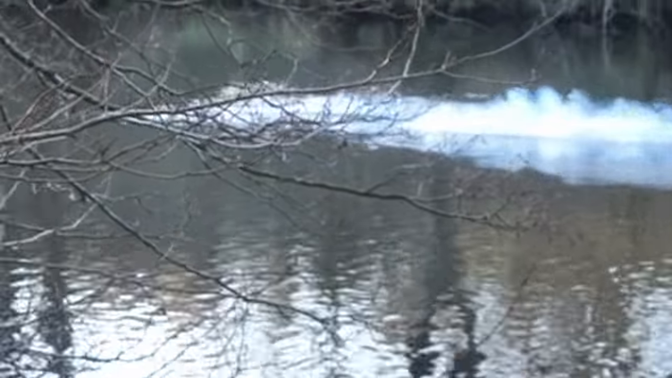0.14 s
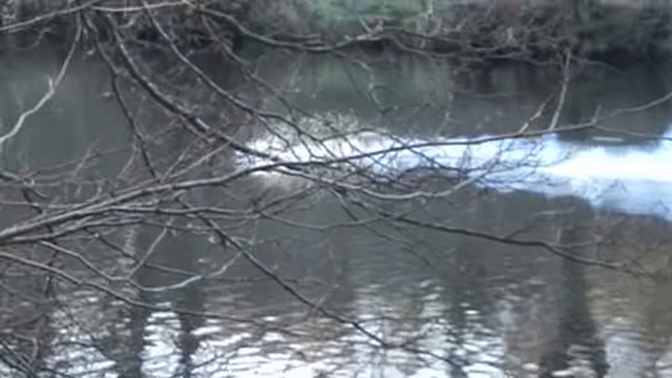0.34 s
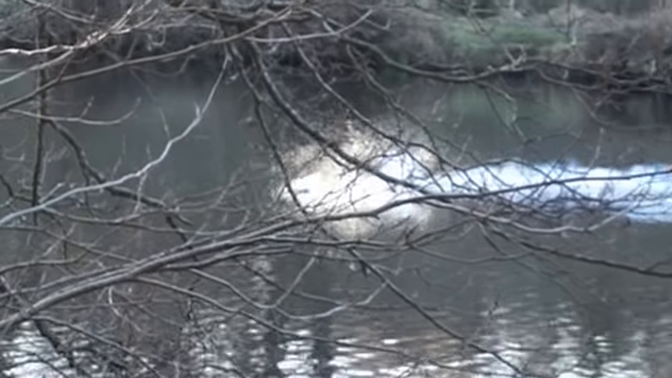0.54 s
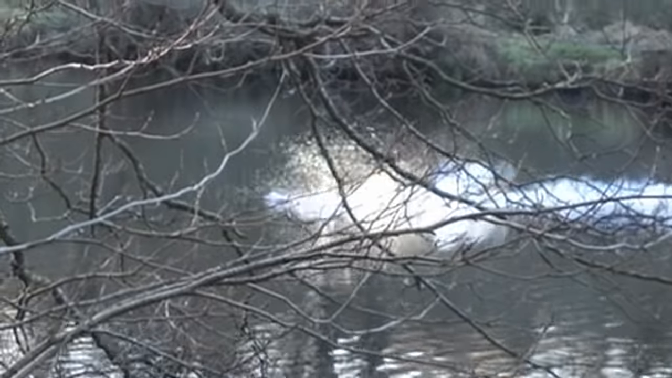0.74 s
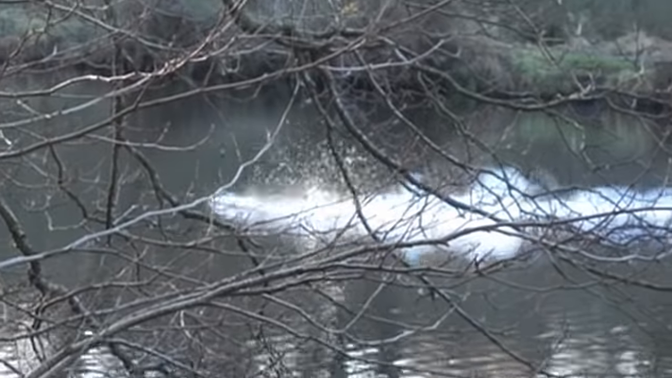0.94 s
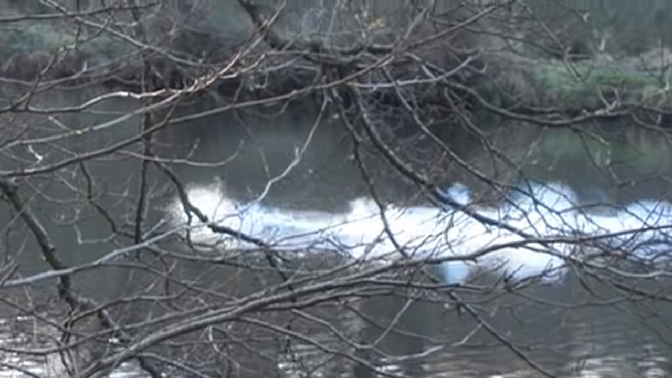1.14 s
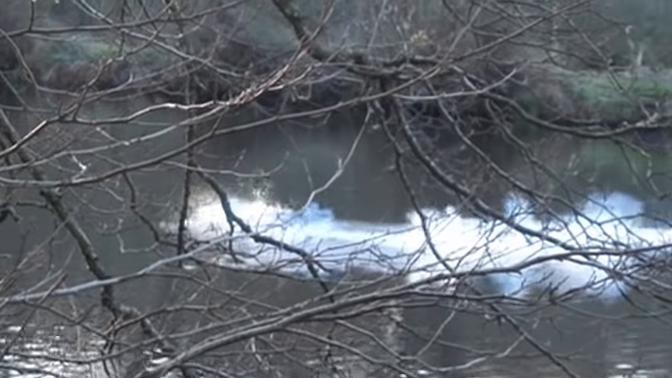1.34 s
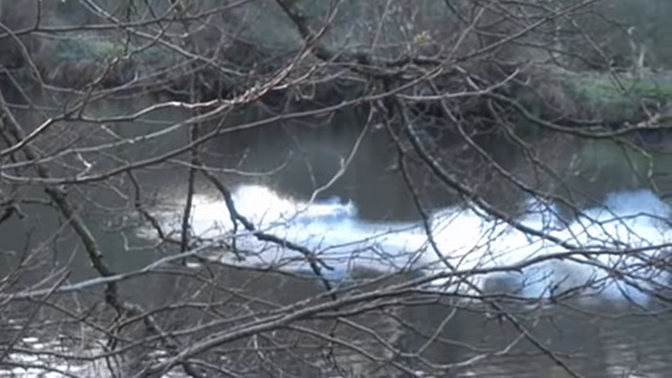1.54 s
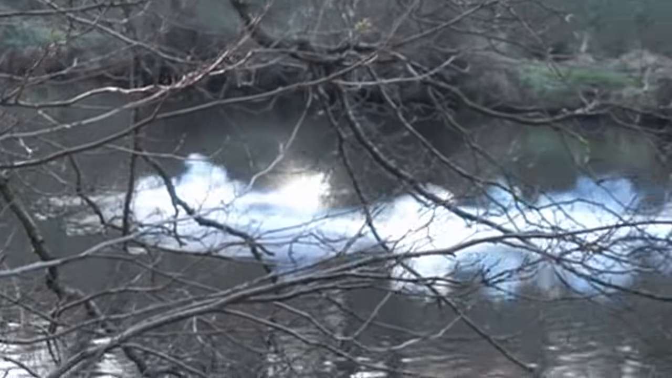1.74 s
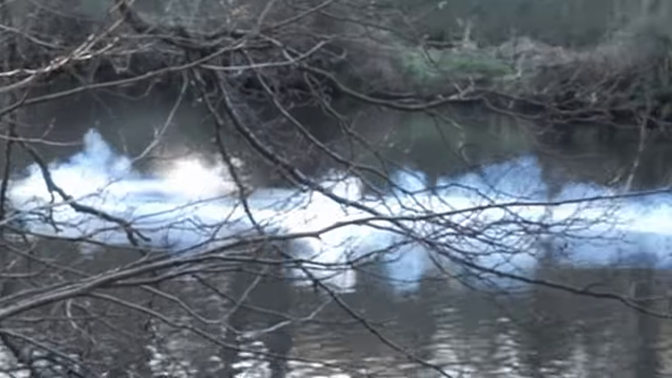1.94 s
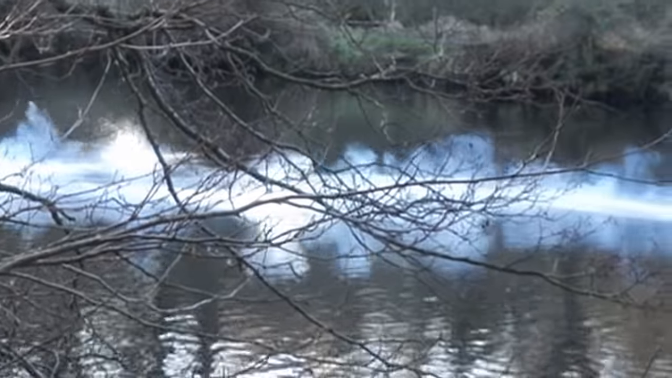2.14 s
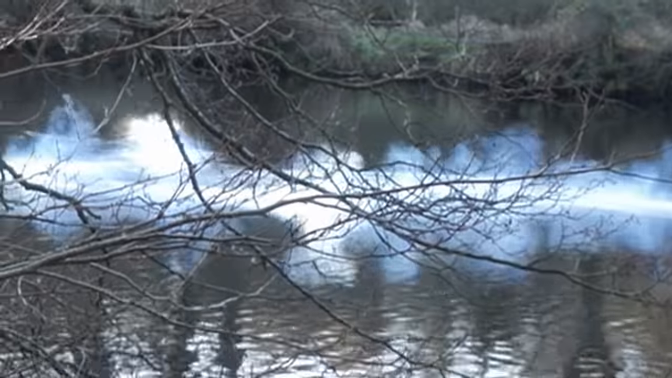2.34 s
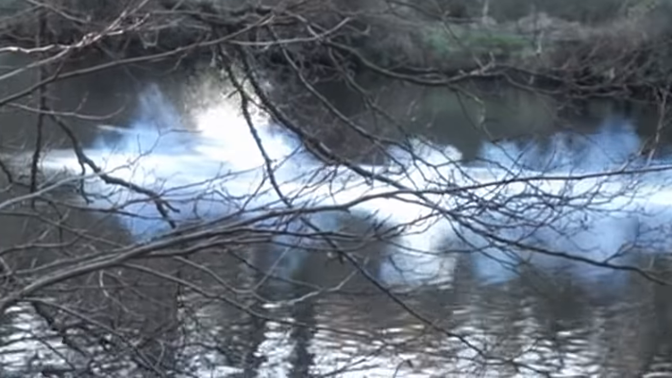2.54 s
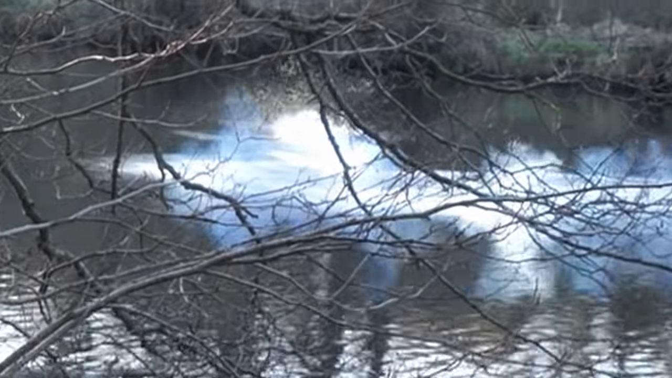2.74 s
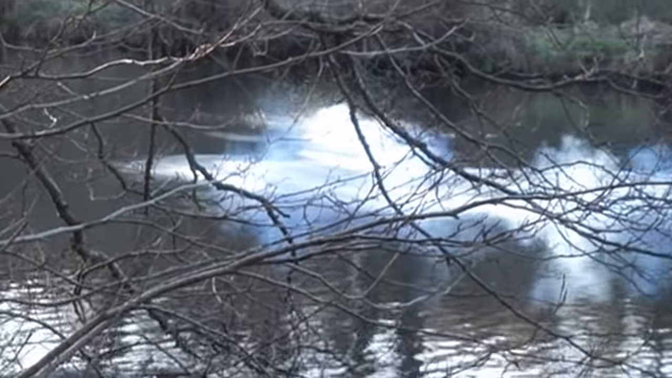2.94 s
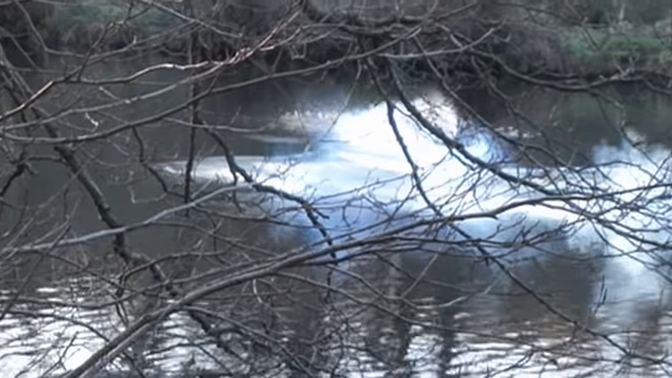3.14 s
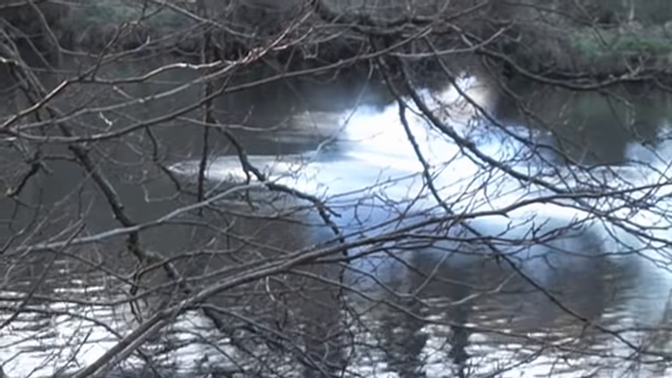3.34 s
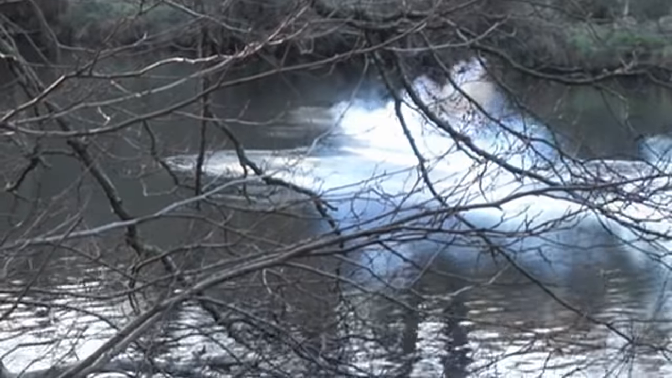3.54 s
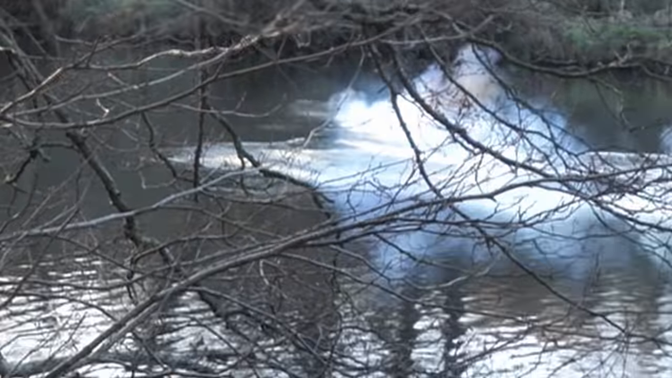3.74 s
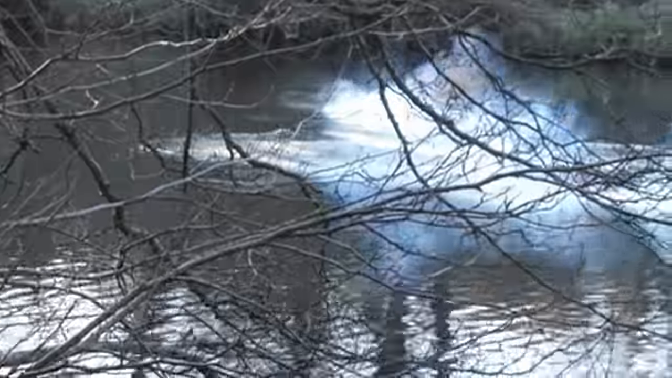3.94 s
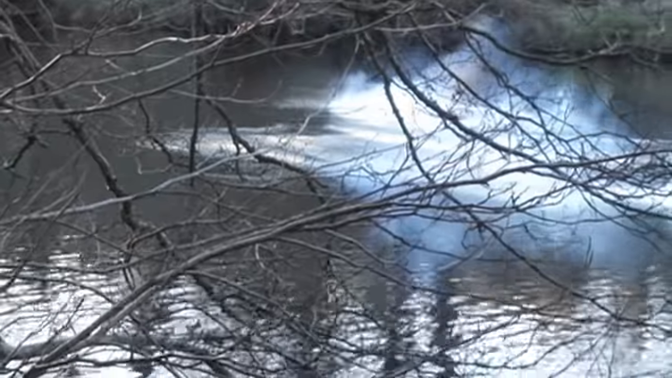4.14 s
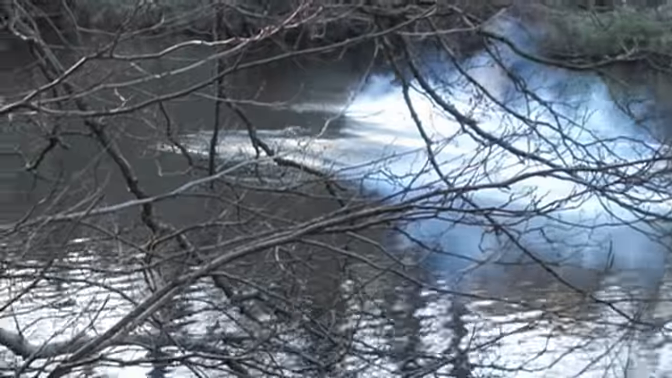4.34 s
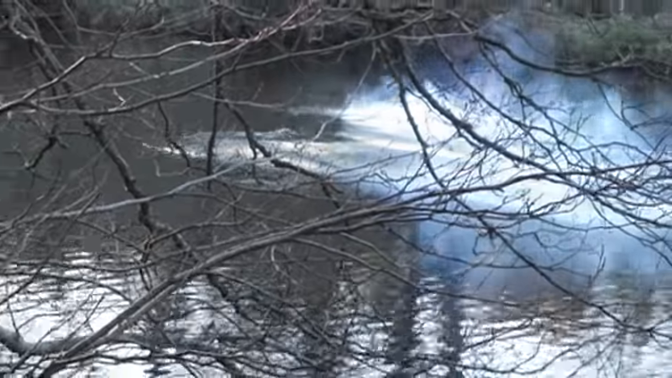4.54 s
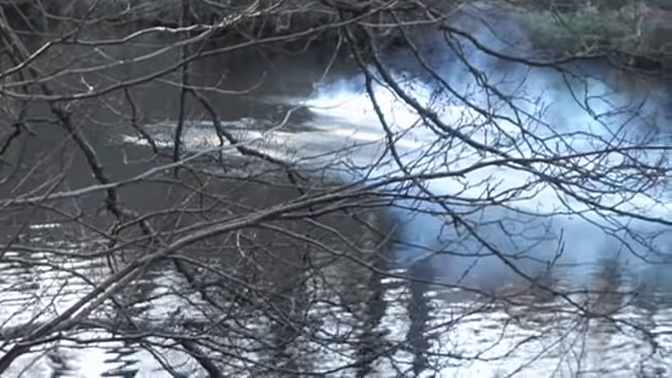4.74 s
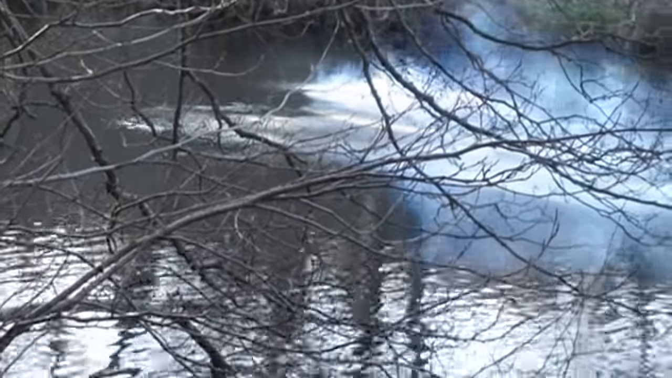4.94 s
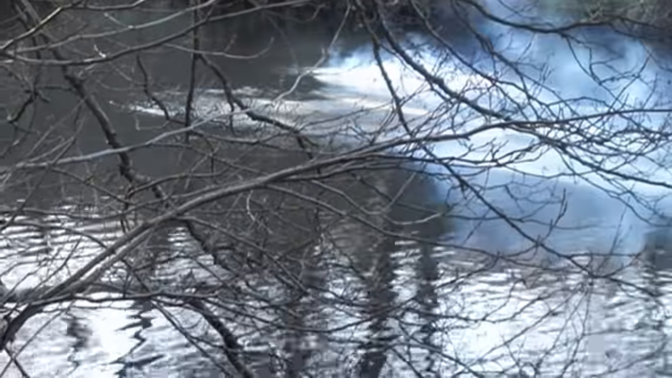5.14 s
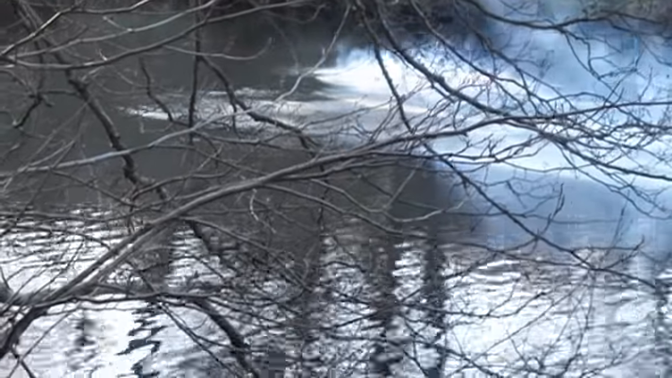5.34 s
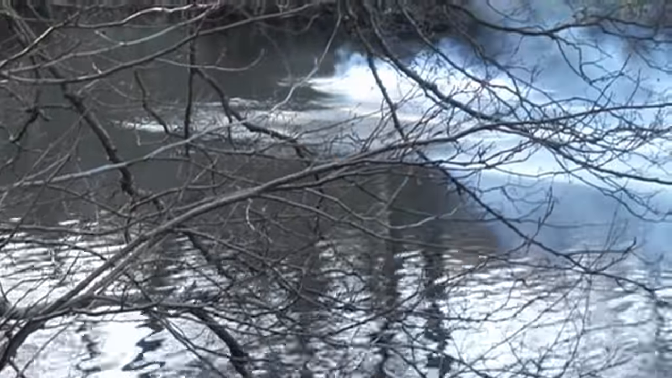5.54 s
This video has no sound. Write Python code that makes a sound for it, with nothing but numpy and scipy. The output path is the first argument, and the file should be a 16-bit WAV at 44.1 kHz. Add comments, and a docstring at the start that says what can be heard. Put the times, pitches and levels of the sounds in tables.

```python
"""A small solid-fuel rocket motor skips over a pond, heard in stereo with close bank reflections and a tail
from the trees. From the start its jet (crackling noise bands) hisses and its wake (sliding and lumpy noise)
roars and churns over a steady far rumble, with swells of the gas pocket's ring and gulps (pitched noise) and
shock pops (short decaying sines). It chokes after about 3.4 s and relights in short bursts. Faint tones and
ticks (noise snaps) sit in the pause before the late bubbles (soft ringing sines) and the last burns."""
import sys
import numpy as np
from scipy import signal
from scipy.fft import rfft, irfft, next_fast_len
from scipy.io import wavfile
from scipy.ndimage import uniform_filter1d, map_coordinates

SR = 44100
rng = np.random.default_rng(int(sys.argv[2]) if len(sys.argv) > 2 else 0)


def to_wav(sig):
    """Store sig (one row per channel, or 1-D mono) as 16-bit WAV at the path in sys.argv[1].

    Samples outside -1..1 are clipped; the rate is SR.
    """
    pcm = np.clip(np.atleast_2d(sig), -1, 1) * 32767
    pcm = np.round(pcm).astype(np.int16)
    wavfile.write(sys.argv[1], SR, pcm.T)  # frames by channels


N = 250488

# Source levels are set ahead of the final mix. Spectra of the noise layers give colour only.
# Free jet, one list per burn: time_s, sizzle_db, hiss_over_sizzle_db, fizz_over_sizzle_db
JET_BURNS = [
    [(0.0, -24.5, -5.5, -10.5), (0.05, -25.5, -1.5, -13), (0.14, -30.5, 0.5, -7), (0.25, -29, -3, -8.5),
     (0.55, -30.5, 1, -8.5), (0.59, -26.5, -3.5, -5.5), (0.68, -17, -5, -11), (0.7, -45.5, 0, -12),
     (0.71, -27, 5, -13.5), (0.73, -36, -4.5, -11.5), (0.8, -31, -4, -3.5), (0.83, -35, 2.5, -18.5),
     (0.85, -45.5, 6.5, -11), (0.91, -39, 3, -15), (0.92, -29.5, -2, -2), (0.95, -19.5, -4.5, -8),
     (0.99, -23, 0, -2.5), (1.01, -46, 14, -8), (1.05, -47.5, 1.5, -5.5), (1.07, -25, -1, -9),
     (1.11, -25, -1, -7.5), (1.13, -26.5, 5.5, -4.5), (1.16, -26.5, 1, -11.5), (1.2, -36.5, 7, -10),
     (1.31, -37, -18.5, -16), (1.33, -27, -9, -19.5), (1.39, -22.5, -3, -9), (1.43, -21, -7.5, -12),
     (1.44, -33, 3, -4), (1.47, -29, 2.5, -12), (1.5, -31, 2.5, -5.5), (1.52, -27.5, -4, -12.5),
     (1.53, -17.5, -12.5, -11.5), (1.55, -24, -8.5, 3), (1.57, -18.5, -12, -12), (1.63, -29, 3.5, -6),
     (1.66, -14, -8, -18), (1.67, -14.5, -5.5, -15), (1.68, -21, -0.5, -6), (1.69, -24, 2.5, -16.5),
     (1.82, -37, 0.5, -7.5), (1.88, -29.5, 0.5, -9.5), (1.92, -35, 7.5, -3.5), (2.01, -29, 0, -7),
     (2.29, -33, 2, -10.5), (2.4, -32.5, 2, -10.5), (2.45, -27.5, -4.5, -8.5), (2.58, -48, 6.5, -14.5),
     (2.73, -37.5, 2, -15), (2.76, -25, -4.5, -21.5), (2.77, -30, -3, -15.5), (2.92, -34, -0.5, -14),
     (2.94, -38.5, 3.5, -10), (3.02, -38, 3.5, -15.5), (3.15, -26, 0, -18.5), (3.19, -31.5, 3.5, -21.5),
     (3.3, -25.5, 2, -14), (3.34, -48, 4, -18)],
    [(3.788, -45, -2.5, -10), (3.792, -34.5, -3.5, -11.5), (3.836, -39, 1, -16.5), (4.07, -40, -1, -13.5),
     (4.144, -30.5, 3, -5), (4.17, -24, -6.5, -11), (4.192, -25, -3, -8.5), (4.294, -25.5, -1, -13.5),
     (4.328, -50.5, 6, -19), (4.35, -40, 6.5, -24), (4.38, -48.5, 11.5, -13)],
    [(5.055, -61, -12.5, -16), (5.081, -48, -4.5, -18), (5.139, -41, 5.5, -15.5), (5.147, -31, 2.5, -12),
     (5.165, -38.5, 5, -8.5), (5.245, -37.5, 1.5, -9.5), (5.299, -23, -5, -1), (5.317, -23, 3, -16),
     (5.34, -41.5, 2.5, -12)],
    [(5.568, -55, 11.5, -12.5), (5.586, -50, 4, -10.5), (5.61, -61.5, 10, -12)],
    [(5.642, -38.5, 0.5, -10), (5.658, -36, -1.5, -5), (5.68, -30, -0.5, -10.5)],
]
# Exhaust ploughing the water, one list per burn: time_s, roar_db, growl_over_roar_db, roar_centre_hz
WAKE_BURNS = [
    [(0.0, -23, -17.5, 1810), (0.04, -21.5, -6, 1620), (0.06, -25, -13.5, 1560), (0.1, -23, -8, 2050),
     (0.16, -24.5, -13, 1500), (0.18, -23, -20, 1400), (0.22, -27, -8, 1550), (0.26, -26.5, -9, 2140),
     (0.34, -29, -12.5, 1690), (0.39, -39.5, 0, 1750), (0.41, -25.5, -11, 1700), (0.49, -30.5, -11, 1390),
     (0.53, -36, -13.5, 1720), (0.59, -23, -21, 1700), (0.62, -26.5, -2.5, 1590), (0.64, -21, -18.5, 1900),
     (0.68, -28.5, -20, 1840), (0.87, -27.5, -2, 1700), (0.93, -25, -11.5, 1710), (0.99, -24, -6.5, 1640),
     (1.02, -19.5, -15.5, 2100), (1.07, -29, -2, 1720), (1.1, -24, -2.5, 1850), (1.13, -27.5, -14, 1890),
     (1.19, -24.5, -4, 1670), (1.23, -20.5, -15.5, 1900), (1.4, -26, -6, 1490), (1.45, -25, -10, 1940),
     (1.51, -22.5, -6.5, 1440), (1.59, -33.5, -4.5, 1760), (1.68, -24.5, -19, 2100),
     (1.74, -27.5, -6, 1800), (1.78, -21, -17, 1840), (1.81, -22.5, -10, 1470), (1.82, -20, -16.5, 1450),
     (1.93, -23, -15, 2150), (2.17, -29, -12.5, 1670), (2.22, -23.5, -15.5, 1980), (2.28, -23, -8.5, 1760),
     (2.34, -27.5, -8, 1480), (2.37, -22.5, -12.5, 1620), (2.4, -26.5, -9.5, 1900),
     (2.52, -36, -12.5, 1790), (2.55, -33, -19.5, 1290), (2.57, -29.5, -11.5, 1500),
     (2.63, -31.5, -14.5, 1900), (2.65, -28.5, -11, 1860), (2.7, -38, -27.5, 1510), (2.76, -35, -17, 1890),
     (2.88, -36, -11, 1930), (2.93, -34.5, -11.5, 1610), (2.97, -36.5, -8, 1673), (2.98, -28.5, -9, 1860),
     (3.02, -36.5, -10, 2100), (3.3, -30.5, -14.5, 2280), (3.355, -28.5, -14.5, 2190),
     (3.38, -35, -9, 2200), (3.45, -46.5, -9.5, 2100)],
    [(3.788, -36, -32, 1790), (3.816, -44, -16, 2110), (3.822, -32.5, -21, 2130), (3.914, -31, -7.5, 2060),
     (3.972, -33, -11.5, 2410), (4.006, -38, -12, 2270), (4.022, -34, -15, 2350), (4.096, -38, -9, 1880),
     (4.132, -37, -7.5, 2260), (4.154, -38.5, -23.5, 2290), (4.19, -31, -12, 2140),
     (4.3, -32.5, -12.5, 2420), (4.316, -34.5, -34.5, 2420), (4.324, -28, -30, 2450), (4.4, -34, -18, 1540),
     (4.46, -41, -3, 1300)],
    [(5.045, -50, -9.5, 1490), (5.101, -35, -7.5, 1830), (5.193, -33, -18, 1920),
     (5.231, -36.5, -5.5, 1780), (5.305, -24, -12.5, 2000), (5.333, -38.5, -5.5, 1970),
     (5.36, -30.5, -9.5, 1550)],
    [(5.566, -33.5, -13, 2060), (5.584, -37, -19.5, 2120), (5.62, -56.5, 9, 1730)],
    [(5.642, -43.5, -8.5, 2210), (5.656, -26.5, -13.5, 2200), (5.68, -31.5, -5.5, 2190)],
]
# Level of the churning water: time_s, level_db
CHURN_LEVEL = [(0, -31), (.06, -45.5), (.4, -37), (.82, -33), (1.04, -43), (1.15, -38), (1.7, -47),
               (1.9, -40), (2.2, -41), (2.3, -34), (2.49, -40.5), (2.54, -50), (3.3, -56), (3.45, -76.5),
               (3.8, -75.5), (4.24, -54), (4.45, -64), (5.06, -71), (5.2, -37.5), (5.34, -48), (5.4, -45),
               (5.68, -48)]
# Colours of the jet, low to high: pitch_hz, density_db (per Hz)
HISS_COLOUR = [(1500, -15.5), (3000, -5.5), (4700, 2.5), (6300, -3), (8000, -5), (12000, -35.5)]
SIZZLE_COLOUR = [(4500, -36.5), (6800, -8), (9200, 4.5), (11500, -6.5), (13500, -27)]
FIZZ_COLOUR = [(9500, -20), (11500, 0), (14000, -1.5), (15800, -17.5)]
# Colour of the roar around its moving centre: offset_octaves, density_db (per Hz)
ROAR_COLOUR = [(-2, -79.5), (-0.98, -32), (-0.81, -7), (0.2, -1), (-1, 1.5), (0.42, -5), (0.73, -10.5),
               (1.5, -19), (2, -52.5), (4.5, -90.5)]
# Colours of the growl and the churn: pitch_hz, density_db (per Hz)
GROWL_COLOUR = [(300, -29.5), (480, -0.5), (700, -2), (900, 7), (1150, -8), (2000, -29.5)]
CHURN_COLOUR = [(60, -25), (150, -20), (280, 2), (400, -2), (550, 0.5), (800, -5), (1300, -35), (3000, -61)]
# Rings of the gas pocket in the wake: pitch_hz, level_over_roar_db
POCKET_RINGS = [(1300, -15.5), (2200, -11.5)]
# Colour of the far rumble: pitch_hz, density_db (per Hz)
FAR_COLOUR = [(25, -22.5), (60, 2.5), (135, 9.5), (190, -1.5), (265, -2.5), (370, -4.5), (540, -2),
              (700, -5), (1080, -2.5), (1300, -3), (1700, -11), (2000, -17.5), (3500, -24.5), (4200, -32),
              (9000, -33.5), (15800, -47)]
# Close reflections off the bank, before drift: delay_ms, signed_gain (ratio)
BANK_REFLECTIONS = [(1.33, .1), (1.46, .13), (1.58, -.22), (2.18, -.09), (2.6, .08)]
# Reflections shifting as the motor travels: time_s, delay_stretch (ratio), strength (ratio)
BANK_DRIFT = [(0, 1.03, .6), (1.3, 1.02, .6), (2.2, 1.06, .6), (2.7, 1.01, .6), (3.1, .995, .9),
              (4, .985, 1.2), (5.68, .985, 1.2)]
# Dull echo off the pond: time_s, delay_ms
POND_DELAY = [(0, 1.57), (2.5, 1.37), (3.5, 1.34), (5.68, 1.6)]
# Decay of the tail among the trees: pitch_hz, t60_s
TREE_DECAY = [(200, 0.28), (1000, 0.7), (2000, 0.8), (3200, 0.92), (5000, 0.74), (6500, 0.6), (9000, 0.38),
              (15000, 0.26)]
# Stereo width of far and scattered sound: pitch_hz, side_over_mid_db (far rumble 1.5 dB narrower)
DIFFUSE_WIDTH = [(60, -42.5), (250, -22), (1000, -12), (4000, -7.5), (12000, -18.5)]
# Side signal added to the near sound, uneven over pitch, lowered by another 8 dB in use: pitch_hz,
# side_over_mid_db
NEAR_SIDE = [(30, -11.5), (60, -48), (250, -25), (1000, -10), (2500, -13.5), (5000, -9), (8500, -34),
             (12000, -7.5)]
# Balance of the near sound: time_s, left_over_right_db
BALANCE = [(0, 0), (1.6, 0.6), (3.5, 0.3), (5.68, 0.6)]
# Swells of the gas pocket's ring, some as water closes over the nozzle: peak_s, pitch_hz, level_db, length_s,
# sink (octaves per s, negative rises)
RING_SWELLS = [(.11, 2850, -29, 0.18, -2), (.19, 1373, -27.5, 0.071, 0.5), (.28, 2140, -27.5, .1, 4),
               (.8, 800, -27.5, 0.085, -1), (1.02, 2230, -24.5, 0.052, -1.5), (1.1, 2165, -28.5, 0.12, 2.5),
               (1.24, 2250, -29, 0.087, 0), (1.355, 1490, -28.5, .06, 0), (1.84, 1300, -26, .08, 0),
               (2.555, 1258, -26.5, 0.054, 3), (2.615, 773, -31.5, 0.19, 4), (2.6, 1976, -32.5, 0.086, -2),
               (2.645, 1910, -26.5, .05, 2.5), (2.67, 1496, -30, .11, 5.5), (2.955, 1653, -35, .13, 0),
               (4.33, 2300, -34.5, .12, 1), (4.41, 2150, -38, 0.073, 0.5), (4.395, 1498, -32.5, .16, 5),
               (4.43, 1080, -33.5, .11, 8.5), (5.39, 768, -42, .14, 9)]
# Single shocks: start_s, level_db (before a 4 dB lift and bass thinning), pitch_hz
POP_HITS = [(0.3032, -1, 1780), (0.415, -17, 1900), (0.6415, -5, 1515), (0.9293, -11.5, 1820),
            (0.9532, -6, 1860), (1.0806, -5.5, 2720), (1.3667, -3, 1460), (1.7239, -4.5, 3160),
            (2.0463, -10.5, 1127), (2.195, -8.5, 1430), (2.2438, -14, 1995), (2.2762, -0.5, 1970),
            (2.4374, -10, 1871), (2.762, -16, 2360), (3.2498, -4, 2505), (3.4486, -22, 2660),
            (4.0777, -18, 2170), (4.111, -27.5, 1540), (4.383, -10.5, 2070)]
# Faint background tones: peak_s, pitch_hz, level_db, length_s, sink (octaves per s)
TONE_SWELLS = [(4.89, 1083, -51, .24, 0), (5, 1065, -50, .16, 0), (4.66, 265, -56, .14, 0),
               (5.41, 263, -48, .32, 0)]
# Faint near ticks: start_s, level_db (before a 1 dB cut and colouring)
TICK_HITS = [(4.7061, -50), (4.7265, -53.5), (4.757, -41.5), (4.7914, -45.5), (4.803, -55)]
# Filter colouring the ticks: pitch_hz, gain_db
TICK_COLOUR = [(3000, -20), (5000, 1.5), (9000, 8.5), (15800, -6.5)]
# Large late bubbles: start_s, level_db (before bass thinning), pitch_hz, rise_s
BUBBLES = [(5.097, -33, 300, .006), (5.103, -36, 490, .006), (5.2, -33, 270, .007), (5.245, -34, 480, .007),
           (5.495, -30, 545, .008), (5.603, -39, 800, .009)]

LIGHT_S, CHOKE_S = .014, 0.031  # a burn rises from and falls to silence
LUMPS_DB, LUMPS_PER_S = 1.2, 14  # random swells of roar, growl and churn
WANDER_HZ, POCKET_ENDS_S = 199.8, 2.5
FAR_DB = -45
POND_GAIN, POND_DULL_HZ = 0.13, 3300
TOP_HZ = 15800


def amp(db):
    """Decibels to gain."""
    return 10 ** (np.asarray(db) / 20)


def unit(x):
    """Scale to rms 1."""
    return x / np.sqrt(np.mean(x ** 2) + 1e-20)


def along(points, hz):
    """Read (Hz, value) points on a log frequency axis."""
    point_hz, values = np.transpose(points)
    return np.interp(np.log(hz + 1), np.log(point_hz + 1), values)


def curve(rows):
    """Draw (s, value) rows as one value per sample."""
    return np.interp(np.arange(N) / SR, *np.transpose(rows))


def column(burns, index):
    """Draw one level column of all burns in dB, with silence between burns."""
    curves = []
    for burn in burns:
        # columns after the first level are given relative to it
        levels = [(row[0], row[1] + (row[index] if index > 1 else 0)) for row in burn]
        lit = (burn[0][0] - LIGHT_S, -110)
        choked = (burn[-1][0] + CHOKE_S, -110)
        curves.append(curve([lit] + levels + [choked]))
    return np.max(curves, axis=0)


def wobble(rate):
    """A smooth random curve with rate knots a second."""
    knots = rng.standard_normal(int(N * rate / SR) + 4)
    return map_coordinates(knots, [np.arange(N) * rate / SR])


def filtered(x, response):
    """Shape x by a response given as a function of frequency."""
    size = next_fast_len(N + SR // 2)
    spectrum = rfft(x, size) * response(np.fft.rfftfreq(size, 1 / SR))
    return irfft(spectrum, size)[..., :N]


def shocks():
    """White noise and a heavy-tailed size for each sample: the crackle of small shock fronts."""
    noise = rng.standard_normal(N)
    size = np.minimum(rng.exponential(size=N), 4)
    return noise, size


def turbulence(spectrum, flow, patchy_db, flutter_db, spiky_db, fast_hz, centre_hz=None):
    """Flow noise at rms 1 with crackle, fast flutter and random patches; its colour may ride a moving centre."""
    noise, size = flow
    drive = noise * amp(spiky_db * size + flutter_db * wobble(fast_hz))
    hz, t, z = signal.stft(drive, SR, nperseg=512)
    patches = uniform_filter1d(rng.standard_normal(z.shape), 6, 0)
    patches = uniform_filter1d(patches, 8, 1)
    z = z * amp(patchy_db * unit(patches))
    if centre_hz is None:
        patchy = signal.istft(z, nperseg=512)[1][:N]
        return unit(filtered(patchy, lambda f: amp(along(spectrum, f))))
    centre = centre_hz[np.minimum(t * SR, N - 1).astype(int)]
    octaves = np.log2((hz[:, None] + 1) / centre)
    gain = amp(np.interp(octaves, *np.transpose(spectrum)))
    gain = gain / np.linalg.norm(gain, axis=0)  # even power as the centre slides
    return unit(signal.istft(z * gain, nperseg=512)[1][:N])


def glides(tracks, width_hz, steady):
    """A band of noise, part steady tone, around each moving pitch."""
    out = np.zeros(N)
    for hz, db in tracks:
        turn = np.exp(2j * np.pi * np.cumsum(hz) / SR)
        slow = steady + wobble(width_hz) + 1j * wobble(width_hz)
        out += amp(db) * unit((slow * turn).real)
    return out


def swells(rows):
    """Pitch and level of each row: a rounded swell, 20 dB down at its ends, on a gliding pitch."""
    t = np.arange(N) / SR
    tracks = []
    for peak_s, hz, db, length, sink in rows:
        pitch_hz = hz * 2 ** (-sink * np.clip(t - peak_s, -length, length))
        level_db = db - 20 * (2 * (t - peak_s) / length) ** 2
        tracks.append((pitch_hz, level_db))
    return tracks


def radiated(x):
    """So small a burst radiates little bass: a gentle low cut at 300 Hz."""
    return filtered(x, lambda hz: 1j * hz / (1j * hz + 300))


def jet(flow):
    """The free exhaust: mid hiss, a bright sizzle of small shocks and their thin top."""
    hiss = turbulence(HISS_COLOUR, flow, patchy_db=2.2, flutter_db=1.5, spiky_db=2.5, fast_hz=143.0)
    sizzle = turbulence(SIZZLE_COLOUR, flow, patchy_db=3.0, flutter_db=2.5, spiky_db=-2.0, fast_hz=260.6)
    fizz = turbulence(FIZZ_COLOUR, flow, patchy_db=1.2, flutter_db=2.5, spiky_db=2.5, fast_hz=238)
    out = amp(column(JET_BURNS, index=1)) * sizzle
    out += amp(column(JET_BURNS, index=2)) * hiss
    return out + amp(column(JET_BURNS, index=3)) * fizz


def wake(flow):
    """Exhaust driven into the water: a rough roar that slides up and down, a growl and lumpy churning."""
    centre_hz = curve([(row[0], row[-1]) for burn in WAKE_BURNS for row in burn])
    roar = turbulence(ROAR_COLOUR, flow, patchy_db=2.0, flutter_db=2.0, spiky_db=2.5, fast_hz=140.3,
                      centre_hz=centre_hz)
    growl = turbulence(GROWL_COLOUR, flow, patchy_db=1.2, flutter_db=1.5, spiky_db=3.5, fast_hz=110)
    churn = turbulence(CHURN_COLOUR, flow, patchy_db=1.0, flutter_db=2.0, spiky_db=3.0, fast_hz=41.05)
    levels_db = [column(WAKE_BURNS, index=1), column(WAKE_BURNS, index=2), curve(CHURN_LEVEL)]
    out = np.zeros(N)
    for db, layer in zip(levels_db, [roar, growl, churn]):
        out += amp(db + LUMPS_DB * wobble(LUMPS_PER_S)) * layer
    return out


def gas_pocket():
    """The gas pocket in the wake rings at wandering pitches while the motor runs, up to POCKET_ENDS_S."""
    ended_db = np.where(np.arange(N) / SR < POCKET_ENDS_S, 0, -120)
    open_db = ended_db + column(WAKE_BURNS, index=1)
    rings = [(hz + WANDER_HZ * wobble(12), open_db + db + 3 * wobble(14.67)) for hz, db in POCKET_RINGS]
    return glides(rings, width_hz=350, steady=0)


def distance():
    """Steady dull rumble from far away, a little to the right."""
    mid = turbulence(FAR_COLOUR, shocks(), patchy_db=.5, flutter_db=.5, spiky_db=0, fast_hz=6)
    other = turbulence(FAR_COLOUR, shocks(), patchy_db=.5, flutter_db=.5, spiky_db=0, fast_hz=6)
    side = filtered(other, lambda f: amp(along(DIFFUSE_WIDTH, f) - 1.5))
    return amp(FAR_DB) * np.array([mid + side, mid - side]) * amp([[-.6], [.6]])


def delayed(x, ms):
    """Sound arriving late by a fixed or moving delay."""
    return map_coordinates(x, [np.arange(N) - ms / 1000 * SR])


def bank(x):
    """Direct sound plus the dull pond echo and the close bank reflections at their drifting delays."""
    stretch = curve([(row[0], row[1]) for row in BANK_DRIFT])
    strength = curve([(row[0], row[2]) for row in BANK_DRIFT])
    dull = filtered(x, lambda hz: 1 / (1 + (hz / POND_DULL_HZ) ** 4))
    echoes = POND_GAIN * delayed(dull, curve(POND_DELAY))
    for ms, gain in BANK_REFLECTIONS:
        echoes += gain * delayed(x, ms * stretch)
    return x + strength * echoes


def trees(x):
    """Scattered tail: fresh noise carries the lingering power of each band, decaying at that band's t60."""
    hz, t, z = signal.stft(np.pad(x, (700, 0))[:N], SR, nperseg=256)  # tail starts 700 samples late
    keep = amp(-120 * t[1] / along(TREE_DECAY, hz))  # power kept per frame: 60 dB lost in t60
    power = np.array([signal.lfilter([1 - k], [1, -k], p) for k, p in zip(keep, np.abs(z) ** 2)])
    power = np.abs(uniform_filter1d(power, size=3, axis=0))
    fresh = signal.stft(rng.standard_normal((2, N)), nperseg=256)[2]
    uneven = uniform_filter1d(rng.standard_normal(z.shape), size=60, axis=1)  # bands swell and drop out
    fresh = fresh / np.sqrt(np.mean(np.abs(fresh) ** 2)) * amp(1.8 * unit(uneven))
    mid, other = signal.istft(fresh * np.sqrt(power), nperseg=256)[1][:, :N]
    side = filtered(other, lambda f: amp(along(DIFFUSE_WIDTH, f)))
    return np.array([mid + side, mid - side])


def pocket_swells():
    """The gas pocket's ring swells and fades, its pitch sinking, holding or rising; some swells come as water
    closes over the nozzle."""
    return glides(swells(RING_SWELLS), width_hz=440, steady=.2)


def pops():
    """Each shock is a brief push of pressure: a sine at full swing in 2/3 cycle and 60 dB down in six."""
    out, t = np.zeros(N + SR), np.arange(SR // 10) / SR
    for s, db, hz in POP_HITS:
        attack = np.minimum(t * hz * 1.5, 1)
        decay = amp(-60 * t * hz / 6)
        out[round(s * SR):][:len(t)] += amp(db + 4) * np.sin(2 * np.pi * hz * t) * decay * attack
    return radiated(out[:N])


def tones():
    """Faint background tones: nearly steady pitches that swell and fade."""
    return glides(swells(TONE_SWELLS), width_hz=45, steady=.8)


def ticks():
    """Each tick is a bright snap of noise, 60 dB down in 4 ms."""
    out, t = np.zeros(N + SR), np.arange(SR // 10) / SR
    for s, db in TICK_HITS:
        out[round(s * SR):][:len(t)] += amp(db - 1.0) * rng.standard_normal(len(t)) * amp(-60 * t / .004)
    return filtered(out[:N], lambda hz: amp(along(TICK_COLOUR, hz)))


def bubbles():
    """Each large bubble is a soft ring that rises smoothly and dies away."""
    out, t = np.zeros(N + SR), np.arange(SR // 10) / SR
    for s, db, hz, rise in BUBBLES:
        swell = t / rise * np.exp(1 - t / rise)
        out[round(s * SR):][:len(t)] += amp(db) * swell * np.sin(2 * np.pi * hz * t)
    return radiated(out[:N])


def near_stereo(near):
    """Pan the near sound and add a side signal whose random phase drifts along frequency."""
    def spread(f):
        phase = np.cumsum(rng.normal(0, 0.12, len(f)))
        return amp(along(NEAR_SIDE, f) - 8) * np.exp(1j * phase)

    side = filtered(near, spread)
    pan_db = curve(BALANCE) / 2
    return near * amp([pan_db, -pan_db]) + np.array([side, -side])


def scene():
    """Mix the motor with its close reflections, its tail and the background."""
    flow = shocks()  # one flow drives every band, so each shock is broad
    motor = jet(flow) + wake(flow) + gas_pocket() + pocket_swells() + pops() + ticks() + bubbles()
    direct = near_stereo(bank(motor))
    return amp(-3.5) * direct + amp(-12.0) * trees(motor) + distance() + tones()


def record(dry):
    """A dull echo off the ground, the microphone's bass cut and the band limit."""
    def ground(hz):
        echo = np.exp(-2j * np.pi * hz * 0.003843)  # 3.843 ms late
        return 1 + 0.22 * echo / (1 + (hz / 1300) ** 2)

    def bass_cut(hz):
        return (1j * hz / (1j * hz + 110)) ** 4

    return filtered(dry, lambda hz: ground(hz) * bass_cut(hz) * (hz < TOP_HZ))


dry = scene()
out = record(dry)
to_wav(out)
```